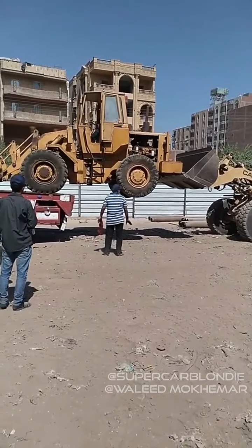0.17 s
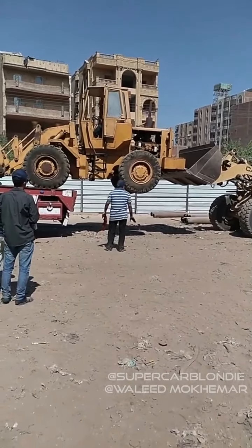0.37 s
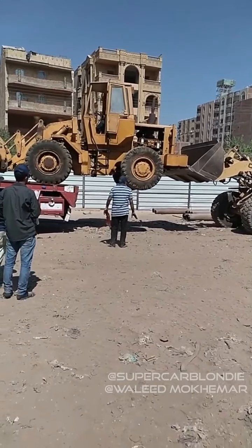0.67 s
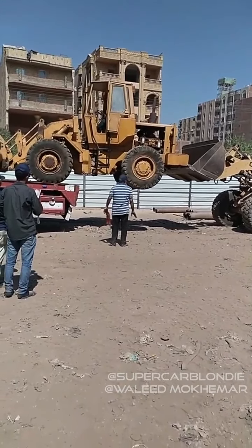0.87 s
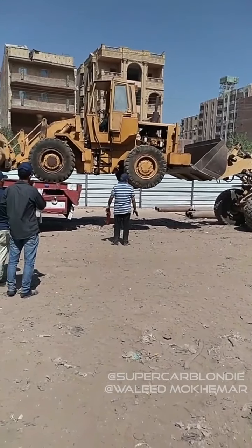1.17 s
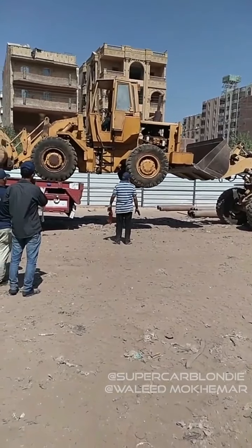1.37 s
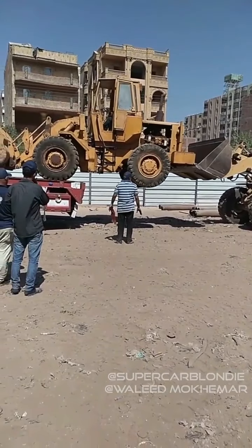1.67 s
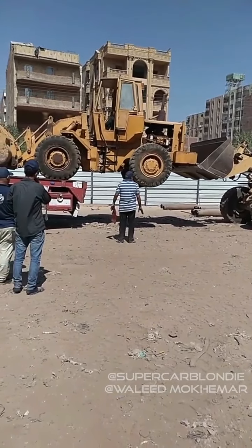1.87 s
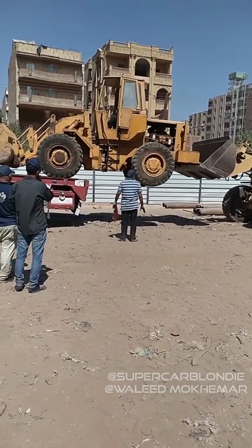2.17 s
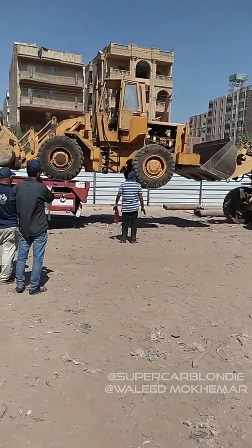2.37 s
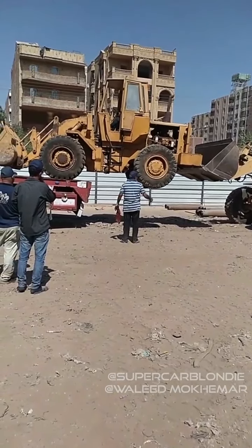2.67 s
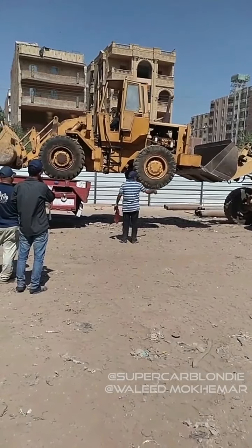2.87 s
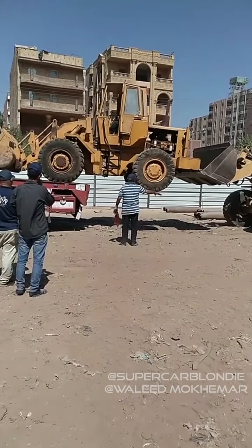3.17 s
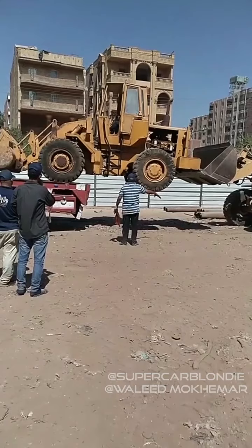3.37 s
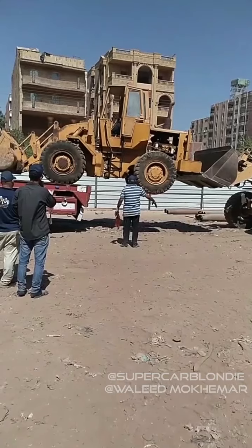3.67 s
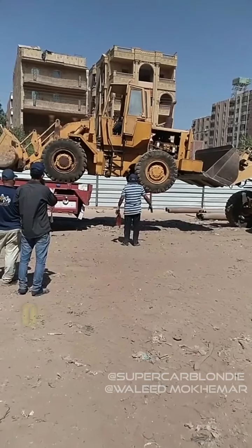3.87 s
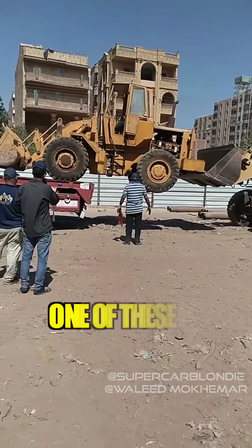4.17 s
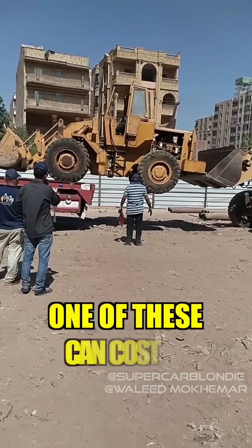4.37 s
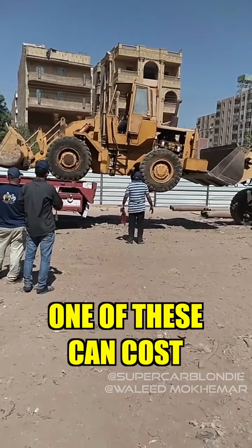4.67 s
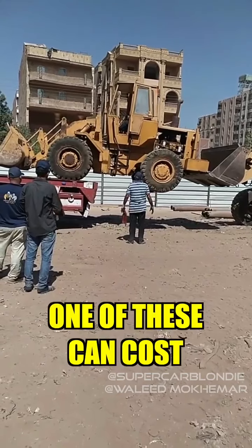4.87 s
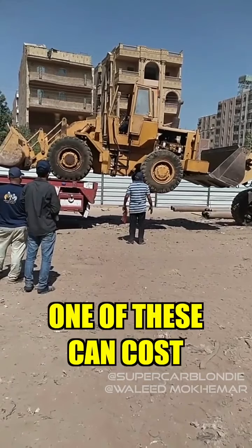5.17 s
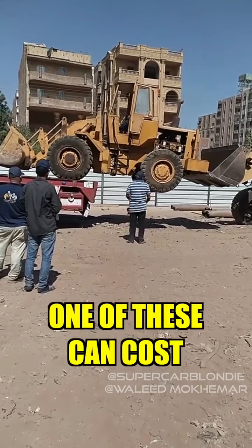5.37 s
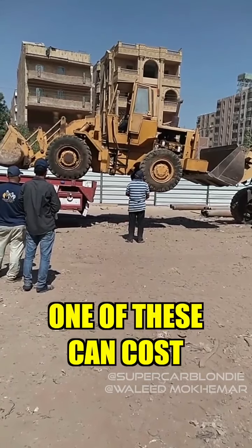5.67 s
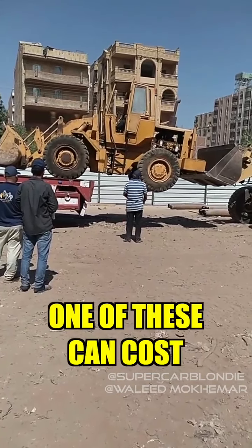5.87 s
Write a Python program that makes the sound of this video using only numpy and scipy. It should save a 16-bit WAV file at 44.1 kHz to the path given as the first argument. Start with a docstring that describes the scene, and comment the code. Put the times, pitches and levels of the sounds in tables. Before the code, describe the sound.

In an open dirt yard, a big diesel loader runs at fast idle, clattering quickly and unevenly over a dull low drone. A light steel clank comes early. Strong gusts then thump and rumble on the left microphone before easing. Hard knocks stand out mid-way, and near four seconds a louder clank sets off a hollow, shuddering boom. The engine carries on to the end.

```python
"""On open ground, a diesel wheel loader at a fast idle holds a second machine up in its bucket.
Cylinder blows drive noise and clean strikes through ringing panels; a slower hissing beat runs against them.
Some knocks hit harder, and a steady noise drone lies under them. Steel clanks, loose panels flare up,
and a hollow boom of decaying sines shudders after a clank. Wind, made of coloured noise and sharp
pressure swings, buffets the microphone ports, mostly the left."""
import sys
import numpy as np
from scipy import signal
from scipy.fft import rfft, irfft, next_fast_len
from scipy.io import wavfile
from scipy.ndimage import uniform_filter1d

SR = 44100
rng = np.random.default_rng(int(sys.argv[2]) if len(sys.argv) > 2 else 0)


def persist_wave(psi):
    """Save psi, clipped to +-1, as 16-bit WAV."""
    counts = np.round(np.clip(psi, -1, 1) * 32767).astype(np.int16)
    wavfile.write(sys.argv[1], SR, np.atleast_2d(counts).T)


N = 265437

# crankshaft speed, sagging as the boom takes weight: t/s, speed/(turns per s)
CRANK_SPEED = [(0, 13.67), (.9, 13.76), (1.5, 14.21), (2.2, 14.43), (2.95, 14.62), (3.5, 13.92), (4, 14.17),
               (4.45, 14.76), (5.1, 14.77), (6.02, 14.57)]
START_TURN = .55  # crank angle at the start, turns
# blows within each turn of the crank: phase/turns, decay/turns,
# then relative level/dB in the thud, knock, rattle and clack bands
BLOWS = [(.75, .14, 1, 12, -5, -1), (.825, .07, 9, 10, 10, 11.5), (.97, .11, 6.5, 1, 8.5, -15),
         (.36, .07, -6, -3, 2, 8), (.42, .11, -1, 2, 5, -12), (.45, .035, 12, 5, -6, -15)]
# centres of those four bands: f/Hz
BAND_HZ = [560, 1000, 1750, 3700]
# clean strike that opens each blow, softer in the treble: level over the blow/dB, one per band
SNAP_DB = [19, 18, 18, 13]
SNAP_JITTER_S = .0008  # spread of the strike times
# resonances of block and panels: f/Hz, width/Hz, left relative level/dB, right relative level/dB
PANELS = [(526.3, 137, -43, -5.5), (585, 170, -11, -9), (898.3, 168, -18, -0.5), (1126, 278, -9, -17.5),
          (1606.5, 266, 1.5, -9.5), (1688, 147, -19, -5.5), (1755, 33, 6.5, -42), (1871, 247, 3.5, -4),
          (2042, 430, -10, -11.5), (2578, 356, -5.5, -8), (3183, 500, -11, -15.5), (3609, 148, 0, -4),
          (3893, 636, -5, -11), (4525, 330, -11, -5), (4870, 57, -21, -4), (5177, 960, -9.5, -38),
          (5454, 340, -1, -42), (5660, 1460, -48, -12), (6353, 940, -13.5, -16.5), (7320, 110, -25.5, -25)]
# engine under load: t/s, engine relative level/dB, thuds' relative level/dB
LOAD = [(0, -34.5, -5), (.17, -36.5, -9.5), (1.7, -35, -3), (2.8, -32.5, -2), (3.4, -35.5, -2),
        (4.45, -33.5, -3.5), (4.9, -33, -11.5), (5.4, -33.5, -2), (6, -34, -6)]
# lowest panel tones against the other thuds: t/s, relative level/dB
DRUMMING = [(0, 6.5), (.6, 7.5), (1.7, -1.5), (2.3, 1.5), (2.9, -1), (3.6, -2), (4.2, -1), (4.7, 3),
            (5.2, 4), (5.5, -4.5), (6, 3)]
# the panel tone nearest BUZZ_HZ, full at first, thin in the middle, fuller at the end: t/s, relative level/dB
BUZZ = [(0, 11), (.8, -2), (3.3, -5.5), (4.6, 2), (6, 5)]
BUZZ_HZ = 1150
# spectrum of the engine's airy top: f/Hz, relative level/dB
FIZZ = [(5000, -10), (7000, 7.5), (8000, -1), (10000, 3), (11500, -3.5), (13000, -21), (14300, -21)]
# narrow gaps in the engine's spectrum: f/Hz, nominal width/Hz
GAPS = [(1350, 80), (2280, 105), (2905, 120), (3410, 42), (4520, 80), (5050, 90), (5860, 37), (7600, 60),
        (9330, 70), (10330, 60), (11020, 90)]
GAP_DRIFT_HZ, GAP_SWELL_DB = 18, 3  # typical wander of centre and of width
# the hardest diesel knocks: t/s, relative level/dB
KNOCKS = [(1.816, -12), (2.031, -18), (2.65, -18), (3.061, -10), (3.271, -13), (3.629, -31), (5.554, -23)]
# steel clanks: t/s, force level/dB, t60/s
CLANKS = [(.094, -29.5, 0.049), (1.327, -26.5, 0.073), (3.841, -22.5, 0.1)]
# steel resonances: f/Hz, width/Hz, left relative level/dB, right relative level/dB
STEEL = [(1870, 240, 13, -7), (2200, 170, 8, -3), (3540, 290, -20, -27)]
# soft blows on the boom: t/s, relative level/dB
SHUDDERS = [(3.853, -21), (3.887, -23.5), (3.97, -15.5), (4.078, -20), (4.13, -24.5), (4.189, -30.5),
            (4.262, -42), (4.339, -33)]
# hollow tones of the boom: nominal f/Hz, relative level/dB, t60/s
HOLLOW = [(94.4, -2, 0.29), (139.2, 0.5, 0.48), (165.2, -2, 0.4), (204.6, -8, 0.4), (245.3, -3, .38),
          (446, -9, 0.071), (641, -4.5, 0.16)]
# loose panels that flare up: t/s, f/Hz, relative level/dB, t60/s
FLARES = [(0.868, 846, -38, 0.46), (2.52, 584, -33, 0.065), (2.665, 590, -32.5, 0.15),
          (2.935, 563, -31, 0.11), (4.472, 603, -34, 0.098)]
# sharp puffs on the left port: t/s, relative level/dB, length/s
PUFFS = [(1.079, -6, .0018), (1.101, -4.5, 0.0011), (1.128, -11, 0.0022), (1.141, -7, 0.00088),
         (1.292, -4, 0.0011), (1.447, -7.5, 0.00099), (1.467, -6, 0.0032), (1.488, -4.5, 0.0011),
         (1.58, -6.5, 0.0016), (1.62, -11, 0.0011), (1.689, -3, 0.0021), (1.874, -11.5, 0.0014),
         (1.943, -9.5, 0.0015), (2.06, -6.5, 0.0026), (2.084, -8, 0.0013), (2.279, -11, 0.0015),
         (2.311, -13.5, 0.0018), (2.384, -15, 0.0013), (2.43, -13.5, 0.0021), (4.271, -17.5, 0.0025),
         (4.34, -15.5, 0.0024)]
PORT_CUT_HZ = 68  # the port sheds a puff's bass below this
# gusts on the ports: start t/s, hold/s, left level/dB, right level/dB (before each port's trim)
GUSTS = [(-.06, 0.059, -37, -51), (0.454, .22, -55, -41.5), (0.778, 0.1, -34, -59),
         (0.967, 0.26, -18, -44.5), (1.347, 0.027, -12, -53), (1.508, 0.19, -33, -41),
         (1.804, 0.29, -17, -49), (2.135, 0.11, -19.5, -42), (2.46, 0.12, -29, -56),
         (2.782, 0.29, -45, -42), (3.632, 0.081, -32, -44), (3.8, 0.45, -35, -47),
         (4.313, 0.05, -30.5, -49), (5.344, 0.039, -34.5, -42.5), (5.458, 0.22, -58, -47.5)]
GUST_RISE_S, GUST_FALL_S = 0.048, 0.066  # build-up time; time for an ordinary gust to sink by a factor e
GALE_DB, GALE_LINGERS = -21, 3.15  # gusts above this level die away this many times more slowly
CALM_DB = -51  # air that always moves over the ports, before trim
# spectrum of strong wind: f/Hz, relative level/dB
GUST = [(20, -44), (40, -46), (70, -1.5), (100, 0.5), (170, -2.5), (250, -8.5), (380, -21.5), (600, -38),
        (1200, -62), (3000, -100)]
# spectrum of low rumble, for light wind and the drone: f/Hz, relative level/dB
BREEZE = [(20, -47), (40, -12.5), (75, 5.5), (120, -2.5), (180, -10.5), (260, -22), (400, -27.5),
          (1000, -74)]
TOP_HZ = 14300  # upper limit of the whole sound


def engine(grit_db, hiss_hz, sway_db):
    """Blows drive the lower panels and hiss the upper ones; the level follows the load."""
    level_db, thud_db = curves(LOAD)
    drum_db, = curves(DRUMMING)
    buzz_db, = curves(BUZZ)
    buzzing = min(PANELS, key=lambda mode: abs(mode[0] - BUZZ_HZ))
    forces, strikes = blow_forces(rise=.012)  # rise in turns
    beat = slow_beat(start=.13, share=.54, depth_db=5)
    hiss = unit(beat * chug(phase=.32, depth_db=2.5))
    low, high = np.zeros((2, 2, N))
    for mode in PANELS:
        band = np.argmin(np.abs(np.log(mode[0] / np.array(BAND_HZ))))
        grit = amp(grit_db * wobble(160) + sway_db * wobble(14))  # every panel rattles in its own way
        if mode[0] > hiss_hz:
            tone = ring(grit * hiss, mode)
        else:
            tone = ring(grit * forces[band], mode, strikes[band])
        if mode is buzzing:
            tone = tone * amp(buzz_db)
        if band == 0:
            tone = tone * amp(drum_db)
        layer = low if band <= 1 else high
        layer += tone
    clatter = amp(4.0) * patchy(yard(high, echo_db=-5), depth_db=2.5)
    thuds = amp(thud_db + 3.0) * patchy(yard(low, echo_db=-2.5), depth_db=3.5)
    top = np.array([amp(-30.5) * rush(FIZZ), rush(FIZZ)])  # the left port is dull
    fizz = (1 + 0.45 * hiss + 2.4 * unit(forces[-1])) * top
    fizz = amp(-13.5) * patchy(yard(fizz, echo_db=-0.5), depth_db=6.5)
    return amp(level_db) * (clatter + thuds + fizz)


def blow_forces(rise):
    """Rattling force and clean strikes per band: every blow snaps, then rattles out over a steady churn."""
    turns = crank()
    scatter_db, colour_db, churn_db = .6, 1.0, -.5
    power = np.full((len(BAND_HZ), N), amp(churn_db) ** 2)
    strikes = np.zeros((len(BAND_HZ), N))
    for phase, length, *band_db in BLOWS:
        count, age = np.divmod(turns - phase + 1, 1)
        count = count.astype(int)
        size, late = rng.standard_normal(size=(2, 128))
        colour = rng.standard_normal((len(BAND_HZ), len(size)))  # no two strokes sound alike
        variation = amp(scatter_db * size + colour_db * colour)
        strength = amp(band_db)[:, None] * variation[:, count]
        power += (strength * (1 - np.exp(-age / rise)) * np.exp(-age / length)) ** 2
        starts = np.flatnonzero(np.diff(count)) + 1
        jitter = (SNAP_JITTER_S * SR * late[count[starts]]).astype(int)
        hits = np.clip(starts + jitter, 0, N - 1)
        strikes[:, hits] += amp(SNAP_DB)[:, None] * strength[:, starts]
    return np.sqrt(power), strikes


def crank():
    """The crankshaft's angle in turns is its speed summed over time."""
    speed, = curves(CRANK_SPEED)
    return START_TURN + np.cumsum(speed) / SR


def slow_beat(start, share, depth_db):
    """Level curve that swells for part of each slow cycle, as from a second idling engine."""
    cycles = 5.63 * np.arange(N) / SR  # 5.63 cycles per second
    swollen = 1.0 * ((cycles - start) % 1 < share)
    return amp(depth_db * uniform_filter1d(swollen, size=600))  # soft edges


def chug(phase, depth_db):
    """Level curve that swells with both firings of each turn."""
    return amp(depth_db * np.cos(4 * np.pi * (crank() - phase)))


def hard_knocks(db, t60, lowest_hz):
    """Some firings hit harder than the rest and ring all the upper panels at once."""
    upper = [mode for mode in PANELS if mode[0] > lowest_hz]
    blows = [(s, knock_db, t60) for s, knock_db in KNOCKS]
    return amp(db) * struck(blows, upper, snap_db=14.5)


def exhaust(db):
    """Low rumbling noise makes a steady, dull drone, alike at both ports."""
    return amp(db) * rush(BREEZE)


def clanks():
    """Steel parts snap together and ring in the steel's resonances."""
    return struck(CLANKS, STEEL, snap_db=17)


def boom(attack, rough_db):
    """A run of soft blows on a large hollow body excites decaying sines, which ring unevenly."""
    out, t = np.zeros(N + SR), np.arange(SR // 2) / SR
    for s, db in SHUDDERS:
        for hz, level, t60 in HOLLOW:
            gain_db, detune = rng.normal(0, 2), rng.normal(0, .04)  # each blow rings a little differently
            decay = amp(db + level + gain_db - 60 * t / t60)
            tone = decay * np.sin(2 * np.pi * (hz * (1 + detune) * t + rng.random()))
            out[round(s * SR):][:len(t)] += tone * (1 - np.exp(-t / attack))
    return out[:N] * amp(rough_db * wobble(45))


def flares(width_hz):
    """A loose panel is jolted and rattles out in one hollow resonance."""
    return sum(struck([(s, db, t60)], [(hz, width_hz, 0, 0)], snap_db=17) for s, hz, db, t60 in FLARES)


def puffs(wake_db, wake_s):
    """Single eddies thump the port with one lopsided pressure swing and leave a short flurry."""
    t = np.arange(N) / SR
    thumps, flurry = np.zeros((2, N))
    for s, db, length in PUFFS:
        u = (t - s) / length
        lopsided = rng.normal(0, 0.56) * u
        thumps += amp(db) * (1 - u ** 2 + lopsided) * np.exp(-u ** 2 / 2)
        flurry += amp(db + wake_db) * np.exp(-np.abs(t - s - wake_s / 2) / wake_s)
    thumps = filtered(thumps, lambda hz: 1 - 1 / (1 + (hz / PORT_CUT_HZ) ** 6))
    return thumps + flurry * rush(GUST)


def buffet(level_db, lumps_db, strong_db):
    """Eddies make lumpy noise on one port; stronger wind is brighter."""
    strong = 1 / (1 + amp(2 * (strong_db - level_db)))
    air = np.sqrt(strong) * rush(GUST) + np.sqrt(1 - strong) * rush(BREEZE)
    return amp(level_db) * unit(air * amp(lumps_db * wobble(28)))


def gust_levels():
    """Wind level in dB on each port: every gust builds up, holds and dies away."""
    t = np.arange(N) / SR
    power = np.full((2, N), amp(CALM_DB) ** 2)
    for s, hold, *port_db in GUSTS:
        fall = GUST_FALL_S * (GALE_LINGERS if max(port_db) > GALE_DB else 1)
        rise = np.clip((t - s) / GUST_RISE_S, 0, 1) ** 2
        release = np.exp(-np.maximum(t - s - GUST_RISE_S - hold, 0) / fall)
        power += (amp(port_db)[:, None] * rise * release) ** 2
    return 10 * np.log10(power)


def struck(blows, modes, snap_db):
    """Metal parts snap against each other and rattle out through the given resonances."""
    t = np.arange(N) / SR
    force, strikes = np.zeros((2, N))
    for s, db, t60 in blows:
        force += (t > s) * amp(db - 60 * np.abs(t - s) / t60)
        strikes[round(s * SR)] = amp(db + snap_db)
    loudness = np.sqrt(np.mean(force ** 2 + strikes ** 2))
    return loudness * unit(sum(ring(force, mode, strikes) for mode in modes))


def ring(force, mode, strikes=0, lag=0.00019, shared=0.37):
    """Rough contact and clean strikes ring one steep resonance; part of it reaches the right port first."""
    centre, width, *port_db = mode
    common, *own = force * rng.standard_normal((3, N))
    direct = np.sqrt(shared) * common + strikes
    arrivals = np.array([np.roll(direct, round(lag * SR)), direct])  # the left hears it lag seconds later
    ports = arrivals + np.sqrt(1 - shared) * np.array(own)
    rung = filtered(ports, lambda hz: 1 / (1 + 2j * (hz - centre) / width) ** 3)
    return amp(port_db)[:, None] * rung / np.sqrt(np.mean(force ** 2))


def yard(x, echo_db):
    """Short echoes off machines and fence ripple the spectrum."""
    t = np.arange(SR // 50) / SR
    echoes = rng.standard_normal((2, len(t))) * (t > .004) * np.exp(-t / .007)
    echoes /= np.linalg.norm(echoes, axis=1, keepdims=True)
    return x + amp(echo_db) * signal.fftconvolve(x, echoes, axes=1)[:, :N]


def patchy(x, depth_db):
    """Narrow bands swell and fade independently, so the sound shimmers; rms 1 over both ports."""
    z = signal.stft(x, nperseg=1024)[2]
    field = rng.standard_normal(z.shape[1:])
    field = uniform_filter1d(field, size=4, axis=0)  # smooth over frequency
    field = uniform_filter1d(field, size=8, axis=1)  # smooth over time
    return unit(signal.istft(z * amp(depth_db * unit(field)), nperseg=1024)[1][:, :N])


def hollowed(x):
    """Narrow bands of the engine sound are thinned out; each gap drifts, widens and narrows at random."""
    hz, s, z = signal.stft(x, SR, nperseg=1024, noverlap=768)
    frames = np.minimum((s * SR).astype(int), N - 1)
    for centre, width in GAPS:
        middle = centre + GAP_DRIFT_HZ * wobble(2.96)[frames]
        reach = width * amp(GAP_SWELL_DB * wobble(5)[frames])
        z = z * (1 - np.exp(-np.abs((hz[:, None] - middle) / reach) ** 3))
    return signal.istft(z, nperseg=1024, noverlap=768)[1][:, :N]


def rush(spectrum):
    """Coloured noise of rms 1."""
    return unit(filtered(rng.standard_normal(N), lambda hz: amp(along(spectrum, hz))))


def filtered(x, response):
    """x shaped by a response, real or complex, over frequency."""
    m = next_fast_len(N + SR // 4)
    return irfft(rfft(x, m) * response(np.fft.rfftfreq(m, 1 / SR)), m)[..., :N]


def wobble(rate):
    """A smooth random curve, rate knots a second."""
    knots = rng.standard_normal(int(N * rate / SR) + 4)
    fine = signal.resample(knots, 8 * len(knots))
    return np.interp(np.arange(N) * rate * 8 / SR, np.arange(len(fine)), fine)


def curves(rows):
    """One value per sample for each column after the time."""
    s, *cols = np.transpose(rows)
    return [np.interp(np.arange(N) / SR, s, c) for c in cols]


def along(points, hz):
    """Values between (f/Hz, value) points, on a log frequency axis."""
    f, v = np.transpose(points)
    return np.interp(np.log(hz + 1), np.log(f), v)


def amp(db):
    """Decibels as an amplitude factor."""
    return 10 ** (np.asarray(db) / 20)


def unit(x):
    """x scaled to rms 1."""
    return x / np.sqrt(np.mean(x ** 2) + 1e-20)


def scene():
    """Engine, steelwork and wind at the two ports."""
    knocking = engine(grit_db=1.5, hiss_hz=4700, sway_db=1.0)
    knocking = knocking + hard_knocks(db=-13.5, t60=0.019, lowest_hz=800)
    machine = hollowed(knocking) + exhaust(db=-47.5)
    structure = amp(-7.5) * boom(attack=0.0046, rough_db=2.0) + clanks() + amp(7.5) * flares(width_hz=140)
    left_db, right_db = gust_levels()
    left = amp(-0.5) * buffet(left_db, lumps_db=4.0, strong_db=-23.5)
    left = left + puffs(wake_db=-11.5, wake_s=0.011)
    right = amp(4.5) * buffet(right_db, lumps_db=2.5, strong_db=0)
    return machine + structure + np.array([left, right])


def record(dry):
    """The loudest peaks are rounded off below 0.75, then nothing passes from the band limit up."""
    rounded = dry / (1 + np.abs(dry / .75) ** 4) ** (1 / 4)
    return filtered(rounded, lambda hz: hz < TOP_HZ)


dry = scene()
out = record(dry)
persist_wave(out)
```